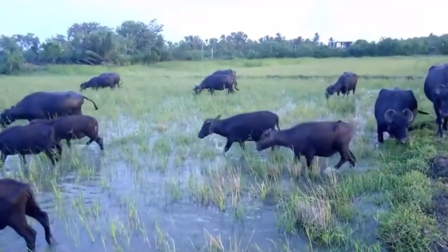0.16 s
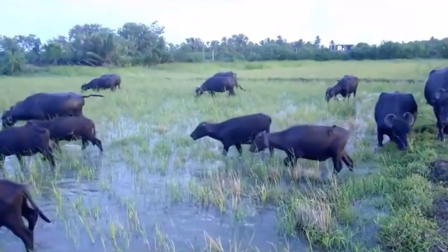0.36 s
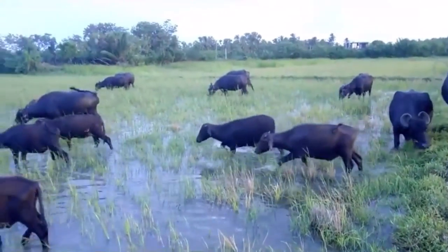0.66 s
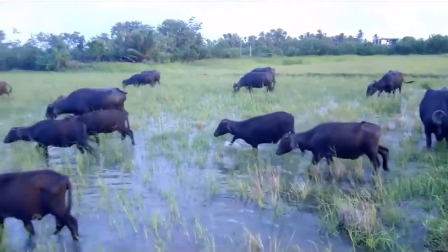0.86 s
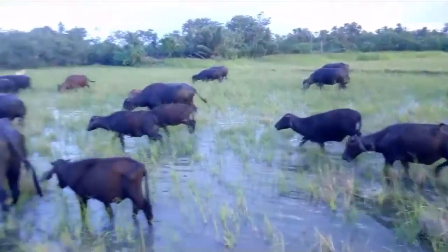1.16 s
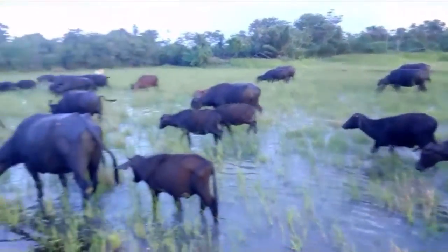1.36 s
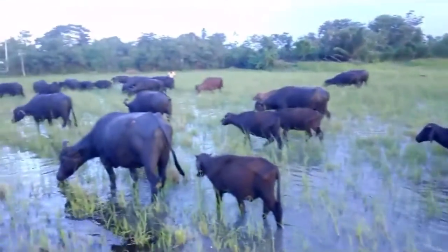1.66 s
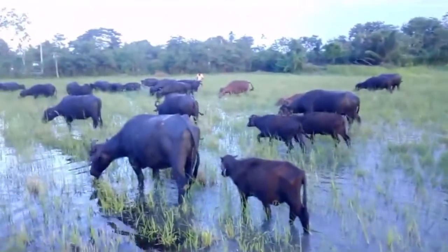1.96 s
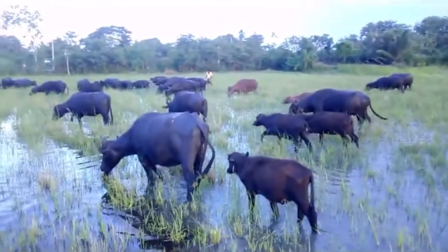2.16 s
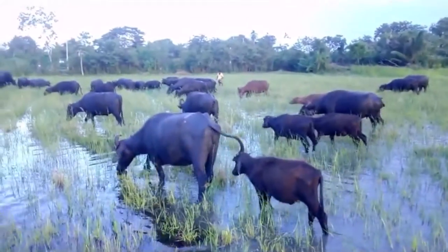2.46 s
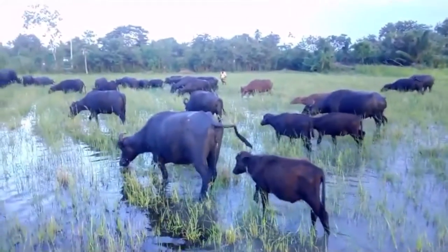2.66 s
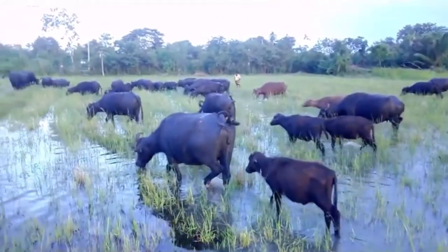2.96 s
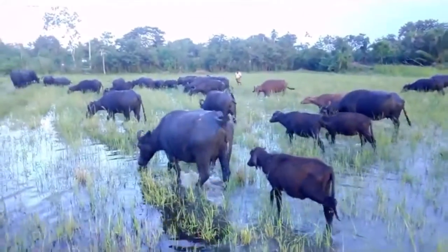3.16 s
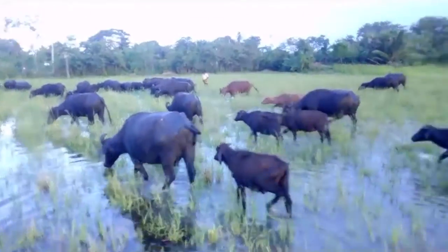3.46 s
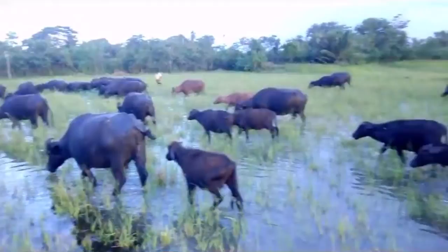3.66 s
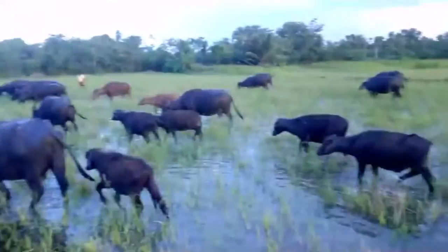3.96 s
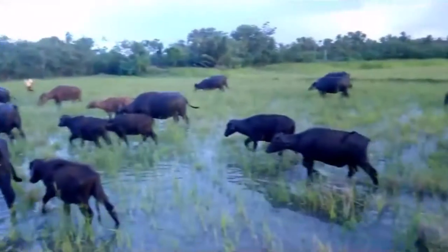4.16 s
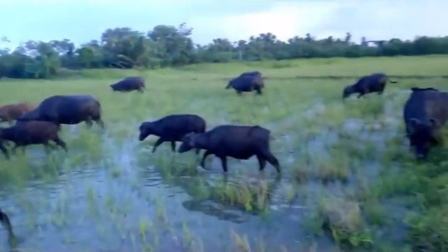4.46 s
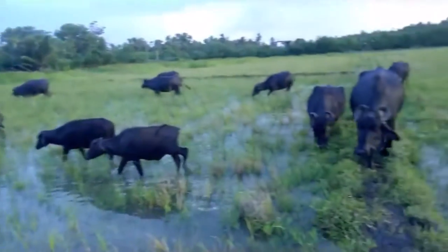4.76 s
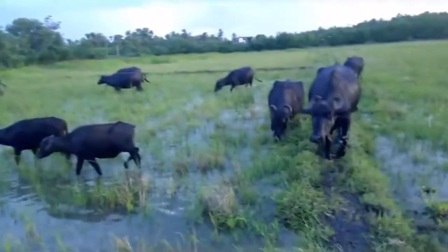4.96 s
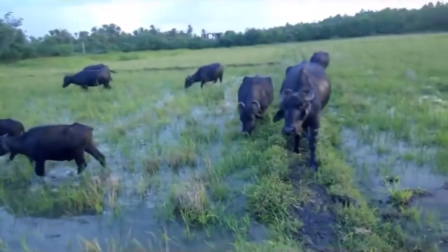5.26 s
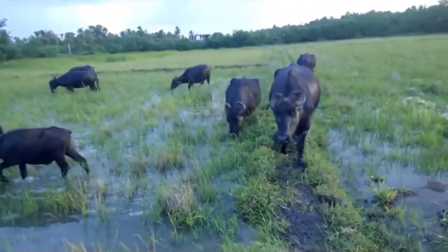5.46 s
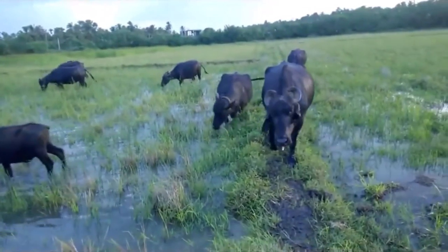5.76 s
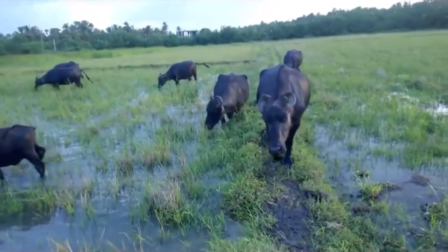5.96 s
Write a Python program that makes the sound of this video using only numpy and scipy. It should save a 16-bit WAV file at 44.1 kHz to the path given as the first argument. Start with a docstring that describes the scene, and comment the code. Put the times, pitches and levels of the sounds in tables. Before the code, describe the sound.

Outdoors in a flooded field, one loud nasal moo from a nearby water buffalo comes first, dropping in pitch into a rough creak with a slight echo. Soft, continuous sloshing and hissing spray follow as the herd walks through shallow water, dotted with hollow hoof plops. Later a faint swish of wet grass draws nearer, all over a low breeze and a barely audible distant engine.

```python
"""A water buffalo lows once, close by: pulses from its vocal folds ring nose, mouth and throat in a
full, nasal note that rises, sags and ends in a slack creak, with a faint echo from the open field.
Then the herd is heard wading on through the flooded field: slosh, bubbles, spray and single hoof
splashes. Towards the end, wet grass swishes against the legs of two animals coming nearer.
A light wind and the faint hum of a far engine lie under it all."""
import sys
import numpy as np
from scipy import signal
from scipy.fft import rfft, irfft, next_fast_len
from scipy.io import wavfile
from scipy.ndimage import uniform_filter1d, minimum_filter1d

SR = 44100
rng = np.random.default_rng(int(sys.argv[2]) if len(sys.argv) > 2 else 0)


def wav_record(signal):
    """Record a signal, one row per channel, as 16-bit PCM in the file named by sys.argv[1]."""
    frames = np.transpose(np.atleast_2d(signal))
    bounded = np.clip(frames, -1, 1)
    # unit amplitude maps onto the largest positive 16-bit level
    quanta = np.round(bounded * 32767).astype(np.int16)
    wavfile.write(sys.argv[1], SR, quanta)


N = 268569
T = np.arange(N) / SR

# spectrum of water spray: f/Hz, relative level/dB
SPRAY_SPECTRUM = [(500, -8.5), (1200, -8.5), (1700, -1.5), (2500, -2.5), (3300, -2), (4500, 0.5),
                  (6700, -2), (7500, -8), (8400, -18), (10000, -16), (13800, -28.5), (14700, -24),
                  (16000, -4)]


def amp(db):
    """The decibel law: 20 dB is a tenfold amplitude."""
    return 10 ** (np.asarray(db) / 20)


def unit_rms(x):
    """Normalisation to an rms of 1."""
    return x / np.sqrt(np.mean(x ** 2) + 1e-20)


def steadied(x, size=1100):
    """Gain control: the running rms is held at 1, while single pulses stay sharp."""
    window = np.hanning(size)
    power = np.convolve(x ** 2, window, "same") / np.convolve(np.ones(len(x)), window, "same")
    return x / np.sqrt(power + 1e-12)


def over_frequency(points, hz):
    """Linear interpolation of a table over log frequency."""
    f, value = np.transpose(points)
    return np.interp(np.log(hz + 1), np.log(f + 1), value)


def over_time(rows, t):
    """Linear interpolation of each column of a table over time."""
    times, *columns = np.transpose(rows)
    return [np.interp(t, times, column) for column in columns]


def add(mix, start_s, sound):
    """Superposition: a sound joins the mix at start_s."""
    part = mix[round(start_s * SR):][:len(sound)]
    part += sound[:len(part)]


def band(x, hz, reach):
    """Band-pass filtering: the amplitude halves at reach Hz either side of hz."""
    f = np.fft.rfftfreq(len(x), 1 / SR)
    return irfft(rfft(x) / (1 + ((f - hz) / reach) ** 4), len(x))


def coloured(x, spectrum):
    """Spectral shaping: x is filtered by a table of levels, then set to rms 1."""
    gain = amp(over_frequency(spectrum, np.fft.rfftfreq(len(x), 1 / SR)))
    return unit_rms(irfft(rfft(x) * gain, len(x)))


def drift(count, hz):
    """Low-pass noise: a random fluctuation of rms 1, mostly slower than hz."""
    return unit_rms(band(rng.standard_normal(next_fast_len(count)), 0, hz)[:count])


def resonate(x, hz, width):
    """A damped resonator of gain 1 and bandwidth width Hz, whose centre hz may move."""
    turn = np.exp(2j * np.pi * np.cumsum(hz * np.ones(len(x))) / SR)
    pole = np.exp(-np.pi * width / SR)
    return 2 * (turn * signal.lfilter([1 - pole], [1, -pole], x / turn + 1e-18)).real


def patchy(x, depth_db, frames, bins):
    """Random modulation: patches of the spectrum, frames long and bins wide, swell and fade."""
    spectra = signal.stft(x, nperseg=1024, noverlap=768)[2]
    patches = uniform_filter1d(rng.standard_normal(spectra.shape), bins, 0)
    patches = unit_rms(uniform_filter1d(patches, frames, 1))
    return signal.istft(spectra * amp(depth_db * patches), nperseg=1024, noverlap=768)[1][:N]


def clicks(per_s, spread_db):
    """A Poisson process: impulses at random times, a few of them large."""
    impulses = (rng.random(N) < per_s / SR) * rng.choice([-1, 1], N)
    return unit_rms(impulses * amp(spread_db * np.minimum(rng.exponential(1, N), 4)))


def wind(level_db=-49, fall_db_per_s=0.75, gust_db=1.4):
    """Turbulence: the low, gusting rumble of a breeze that slowly drops."""
    # spectrum of the breeze: f/Hz, relative level/dB
    spectrum = [(20, -29.5), (38, -14), (52, -2.5), (90, 5), (170, -1), (320, 0.5), (410, -3.5),
                (500, -9.5), (1200, -33)]
    rumble = coloured(patchy(rng.standard_normal(N), depth_db=2.5, frames=14, bins=4), spectrum)
    return amp(level_db - fall_db_per_s * T + gust_db * drift(N, 3.2)) * rumble


def far_engine(waver_hz=0.5, waver_db=2):
    """A line spectrum: low partials waver, each on its own; most fade while one grows louder."""
    # partials of the hum: f/Hz, level at the start/dB, level at the end/dB
    partials = [(55, -53, -66), (72.8, -53, -70), (148.2, -58.5, -61), (218, -70, -60), (301.5, -59, -69.5)]
    hum = np.zeros(N)
    for hz, start_db, end_db in partials:
        level_db = np.linspace(start_db, end_db, N) + waver_db * drift(N, 2)
        phase = 2 * np.pi * np.cumsum(hz + waver_hz * drift(N, 4.2)) / SR
        hum += amp(level_db) * unit_rms(np.sin(phase))
    return hum


def field_echo(x, first_s=.03, echoes_per_s=2000):
    """Scattering: banks and trees return thin echoes, each band dying at its own rate."""
    # reverberation time of the open field: f/Hz, t60/s
    decay_times = [(250, 0.37), (700, 0.37), (2000, 0.43), (6000, 0.087)]
    taps = rng.choice([-1., 1.], SR) * (rng.random(SR) < echoes_per_s / SR) * (T[:SR] > first_s)
    hz, t, spectra = signal.stft(taps, SR, nperseg=256)
    decay = amp(-60 * t / over_frequency(decay_times, hz)[:, None])
    tail = signal.istft(spectra * decay, SR, nperseg=256)[1]
    return signal.fftconvolve(x, tail / np.linalg.norm(tail))[:N]


def grass(start_s=3.74, fade_in_s=0.29, level_db=-55, nearer_db_per_s=2.5):
    """Friction and impact: wet stalks swish and snap against the legs of two approaching animals."""
    stalks = rng.standard_normal(N) + 0.83 * clicks(per_s=200, spread_db=5.5)
    swish = unit_rms(band(patchy(stalks, depth_db=5.5, frames=6, bins=7), hz=1950, reach=700))
    since = T - start_s
    return np.clip(since / fade_in_s, 0, 1) * amp(level_db + nearer_db_per_s * since) * swish


def wading(slosh_db=-3, spray_db=3, bubble_db=-8, surge_db=1.08):
    """Bubble resonance and drop impact: legs push water into a lumpy slosh under a fizz of spray."""
    # how hard the herd stirs the water: t/s, level/dB
    stirring = [(1.02, -45.5), (1.12, -48.5), (2.04, -48), (2.21, -48), (3.33, -44.5), (3.76, -48),
                (4.05, -45.5), (4.53, -47.5), (4.69, -50), (4.97, -50.5), (5.29, -46.5), (5.74, -48),
                (6.05, -49.5)]
    # spectrum of the slosh: f/Hz, relative level/dB
    slosh_spectrum = [(250, -48.5), (500, -13.5), (680, -2), (900, 1.5), (1250, -7), (1700, -6.5),
                      (2100, -20), (2600, -7), (3300, -19), (6000, -31.5)]
    stir_db = over_time(stirring, T)[0]
    slosh = coloured(patchy(rng.standard_normal(N), depth_db=4.0, frames=5, bins=6), slosh_spectrum)
    t = T[:SR // 20]
    bubbles = np.zeros(N)
    for hz in np.geomspace(600, 3000, num=16):
        ping = np.sin(2 * np.pi * hz * t * (1 + 3 * t)) * np.exp(-hz * t / 7)
        bubbles += signal.oaconvolve(clicks(per_s=5, spread_db=5.5), ping)[:N]
    burst = rng.standard_normal(len(t)) * np.exp(-t / 0.005)  # each drop fizzes for a few ms
    drops = unit_rms(signal.oaconvolve(clicks(per_s=450, spread_db=3.5), burst)[:N])
    fizz = rng.standard_normal(N) + 0.86 * drops
    spray = coloured(patchy(fizz, depth_db=3.0, frames=3, bins=18), SPRAY_SPECTRUM)
    spray *= amp(0.83 * drift(N, 27))  # quick flicker
    spray *= amp(surge_db * drift(N, 8.2))  # irregular surges from the herd's strides
    water = slosh + amp(bubble_db) * unit_rms(bubbles)
    return amp(stir_db) * (amp(slosh_db) * water + amp(spray_db) * spray)


def hoof_splashes(plop_trim_db=-3, relative_width=0.45, rise_share=0.018):
    """Impact and cavity resonance: a hoof breaks the surface with a hollow plop, a slap and spray."""
    # hoof falls, led at 1.06 s by a brief rustle of grass: t/s, plop f/Hz, relative plop level/dB, relative
    # burst level/dB, t60/s
    hoof_falls = [(1.06, 1850, -44, -39, 0.43), (1.494, 336, -35.5, -51, 0.072),
                  (1.609, 5900, -29.5, -42, 0.03), (1.685, 678, -37.5, -43, 0.28),
                  (1.992, 960, -33, -33, .09), (2.147, 770, -27.5, -25, 0.041),
                  (2.289, 251, -39, -45, 0.31), (2.484, 2700, -31, -24, 0.021),
                  (2.513, 4500, -30, -34, .075), (2.819, 695, -33, -32, 0.13),
                  (3.069, 420, -32, -34, 0.075), (3.212, 4730, -34, -36, 0.2), (3.31, 900, -38, -36, 0.16),
                  (3.722, 762, -31, -37, 0.14), (3.771, 7500, -30, -31, 0.013),
                  (3.796, 6800, -33, -34, .018), (4.16, 833, -23, -27, 0.049), (4.179, 915, -37, -31, 0.11),
                  (4.33, 395, -40.5, -58, 0.15), (4.445, 5570, -34, -38, .14), (4.66, 1416, -40, -38, 0.18),
                  (5.055, 1610, -34, -46, 0.061), (5.18, 159, -41, -36, 0.26), (5.3, 442, -40.5, -44, 0.37),
                  (5.675, 358, -40, -31.5, 0.17), (5.961, 352, -38, -40, 0.21)]
    out, t = np.zeros(N), T[:SR // 4]
    for start_s, hz, plop_db, burst_db, t60 in hoof_falls:
        impact, fizz = rng.standard_normal((2, len(t)))
        width = relative_width * hz
        hollow = steadied(resonate(resonate(impact, hz, width), hz, width))
        bubble = 0.21 * np.sin(2 * np.pi * hz * t * (1 + 6 * t))  # trapped air rings, rising in pitch
        spray = amp(-4) * coloured(fizz * abs(fizz), SPRAY_SPECTRUM)
        slap = amp(-8) * unit_rms(band(impact, hz=2400, reach=1200))
        splash = amp(plop_db + plop_trim_db) * (hollow + bubble) + amp(burst_db) * (spray + slap)
        attack = 1 - np.exp(-t / (rise_share * t60))  # long splashes also start softly
        add(out, start_s, attack * amp(-60 * t / t60) * splash)
    return out


def pitch(t, top_hz=158.65, top_s=.254, rise_hz=14.4, sag_hz=74.67, sag_s=.516, slack_hz=79.1):
    """The fundamental in Hz: it rises to a top, then sags ever faster until the folds are slack."""
    rise = rise_hz * np.maximum(1 - t / top_s, 0) ** 2
    sag = sag_hz * (np.maximum(t - top_s, 0) / sag_s) ** 3.5
    waver = 0.47 * np.cos(2 * np.pi * 5.36 * (t - top_s))
    return np.maximum(top_hz - rise - sag, slack_hz) - waver


def vocal_folds(t, creak):
    """The glottal source: each closure gives a pulse and a puff of air, more uneven in the creak."""
    jitter, shimmer = 0.0027 + .014 * creak, 0.032 + 0.28 * creak
    hz = pitch(t) * (1 + jitter * drift(len(t), 54))
    cycles = np.cumsum(hz) / SR
    offset = (cycles - np.round(cycles)) * SR / hz  # samples from the nearest closure
    pulses = unit_rms(np.sinc(offset / 2) * np.exp(-(offset / 10) ** 2))
    pulses *= 1 + shimmer * drift(len(t), 50)
    puffs = unit_rms((.5 + np.exp(-(cycles % 1) / .5)) * rng.standard_normal(len(t)))
    return pulses + amp(np.interp(creak, [0, 1], [-22, -9])) * puffs


def formant(drive, creak, full_hz, creak_hz, width, reach=260, skew_hz=0):
    """Resonance: a moving peak whose steep band-pass skirts leave deep valleys between neighbouring formants."""
    passed = band(drive, (full_hz + creak_hz) / 2 - skew_hz, reach)
    return resonate(passed, full_hz + (creak_hz - full_hz) * creak, width)


def swell(t, best_hz, reach):
    """Forced vibration: a resonance's gain peaks whenever a harmonic glides through it."""
    harmonics = np.arange(1, 12)[:, None] * pitch(t)
    return np.linalg.norm(1 / (1 + ((harmonics - best_hz) / reach) ** 2), axis=0)


def throat_formants(t, drive, creak, wander_db=2.2, bounce_s=.0088, bounce_share=0.19):
    """Resonance and interference: the upper formants, comb-filtered by a bounce off the water."""
    # formants: full-voice f/Hz, creak f/Hz, width/Hz, relative level/dB at full voice and in the creak
    formants = [(1084, 1122, 96, 0, -1), (1249, 1369, 115, -3, 0), (1719, 1731, 99, 0, 1),
                (2091, 2006, 81, -8, -2), (2308, 2301, 135, -8, -3), (2688, 2724, 261, -17, -6),
                (3219, 3159, 157, -20, -15), (3472, 3460, 139, -19, -17), (3986, 3977, 321, -23, -24)]
    highest_hz = formants[-1][0]
    direct = np.zeros(len(t))
    for full_hz, creak_hz, width, full_db, creak_db in formants:
        level_db = full_db + (creak_db - full_db) * creak
        level_db += wander_db * (full_hz / highest_hz) * drift(len(t), 11.0)  # tongue and jaw shift
        direct += amp(level_db) * formant(drive, creak, full_hz, creak_hz, width)
    direct = steadied(direct)
    return steadied(direct + bounce_share * np.interp(t - bounce_s, t, direct, left=0))


def buffalo(creak_from_s=.64, creak_full_s=.705, limp_from_s=.774, throb_from_s=.788, end_s=.93):
    """Source and filter: the folds ring nose, mouth and throat; an open mouth lets more sound out."""
    # course of the low: t/s, effort level/dB, mouth opening (0 shut, 1 wide)
    gesture = [(0, -9, 0.1), (.06, -9.5, 0), (.15, -6, 0.57), (.35, -7, 0.85), (.5, -4, 0.53),
               (.57, -7, 0.41), (.62, -8.5, 0.05), (.7, -4.5, 0.57), (.77, -8.5, 0.76), (.8, -18.5, 0),
               (.92, -29, 0)]
    t = T[T < end_s]
    effort_db, opening = over_time(gesture, t)
    creak = np.interp(t, [creak_from_s, creak_full_s], [0, 1])
    drive = vocal_folds(t, creak)

    nose = steadied(formant(drive, creak, full_hz=277.6, creak_hz=276, width=22, reach=135))
    nose *= swell(t, best_hz=268.4, reach=23.5) * amp(-7.5 * creak)
    nose *= amp(5 * np.sin(2 * np.pi * np.clip((t - throb_from_s) / .046, 0, 2)))  # two dying throbs

    mouth = steadied(formant(drive, creak, full_hz=641, creak_hz=598, width=70, reach=110, skew_hz=40))
    mouth *= swell(t, best_hz=611.5, reach=48.4) * amp(-13.5 + 14.6 * opening - 7 * creak)

    rasp = amp(-27) * creak * unit_rms(band(drive, hz=4000, reach=1100))  # slack folds slap shut
    limp = np.clip((t - limp_from_s) / 0.015, 0, 1)  # limp folds: slap and throat grow quieter
    throat = (throat_formants(t, drive, creak) + rasp) * amp(-16 + 4.5 * opening - 4.5 * limp)
    return np.pad(amp(effort_db) * (nose + mouth + throat), (0, N - len(t)))


def scene(echo_db=-24):
    """Superposition: the low and its echo over the wading herd, the wind and the engine."""
    low = buffalo()
    echo = amp(echo_db) * field_echo(low)
    return (low + echo + wading() + grass() + hoof_splashes() + wind() + far_engine())[None]


def record(dry, ceiling=.97, cutoff_hz=15850):
    """Peak limiting and band limiting: the highest peaks are eased down, the top treble is cut."""
    gain = np.minimum(1, ceiling / (abs(dry) + 1e-9))
    limited = dry * uniform_filter1d(minimum_filter1d(gain, size=400), size=400)
    low_pass = signal.firwin(511, cutoff_hz, window=("kaiser", 9), fs=SR)
    return signal.oaconvolve(limited, low_pass[None], "same")


dry = scene()
out = record(dry)
wav_record(out)
```